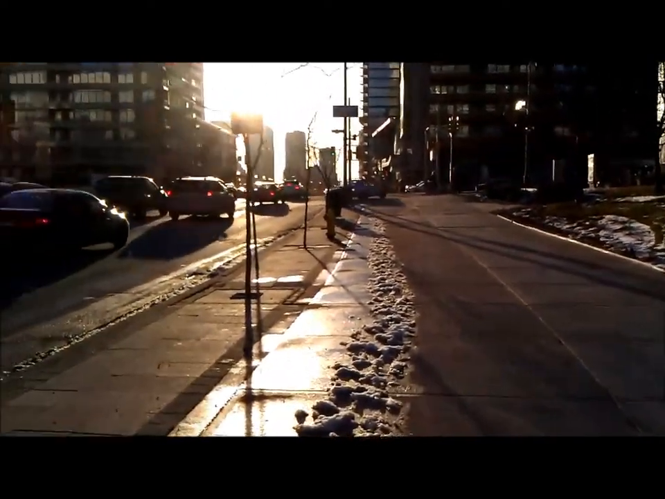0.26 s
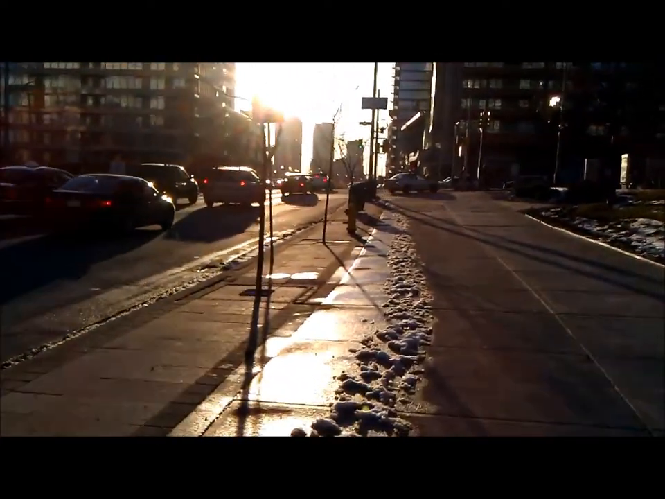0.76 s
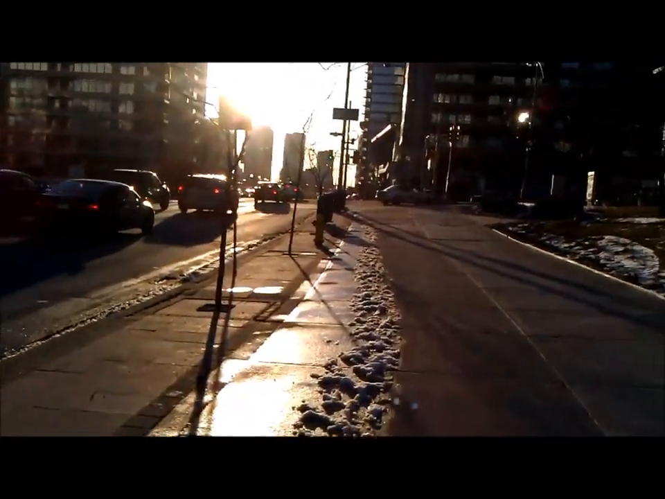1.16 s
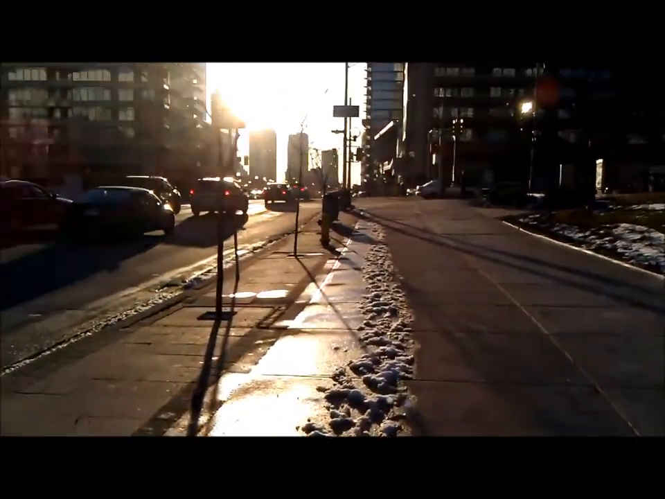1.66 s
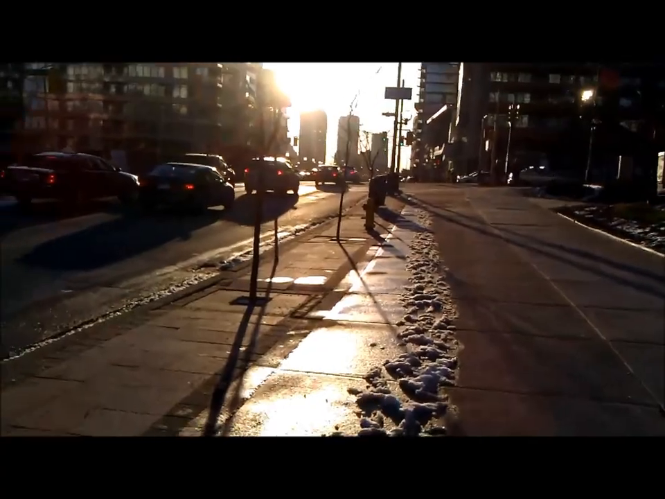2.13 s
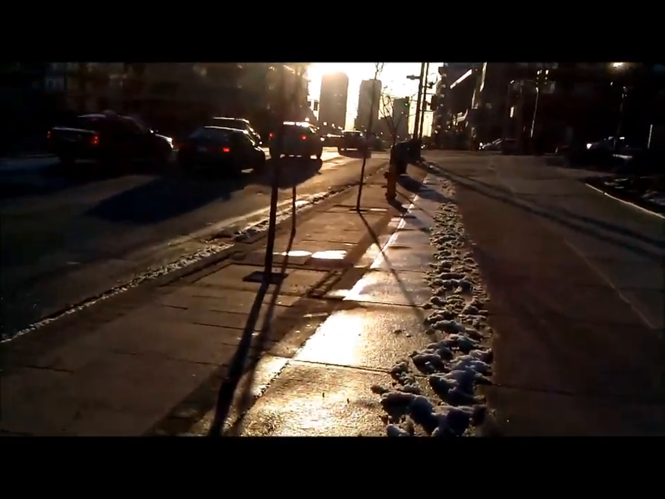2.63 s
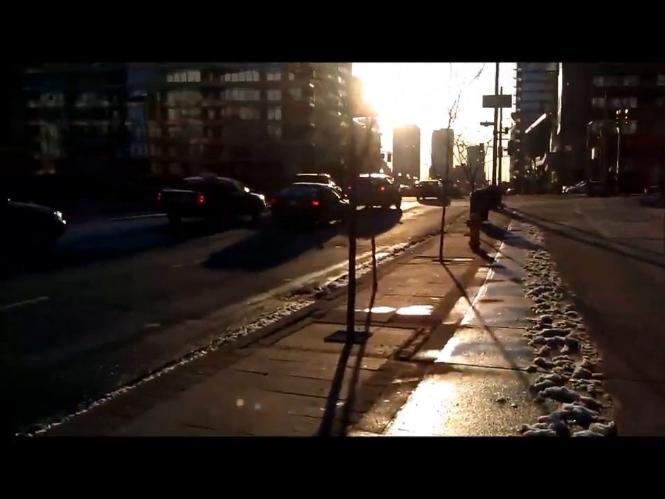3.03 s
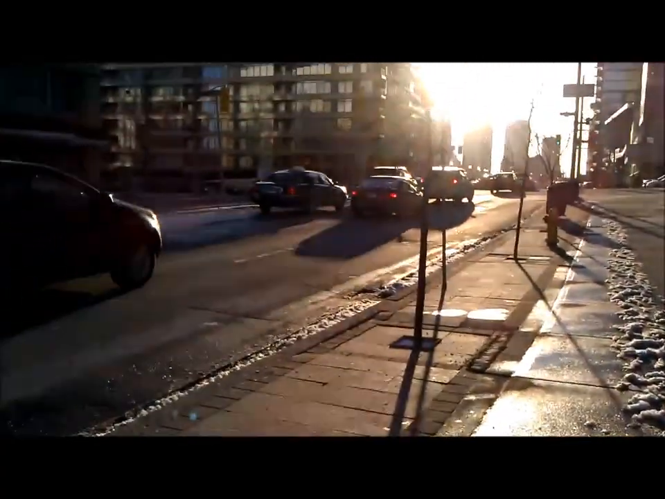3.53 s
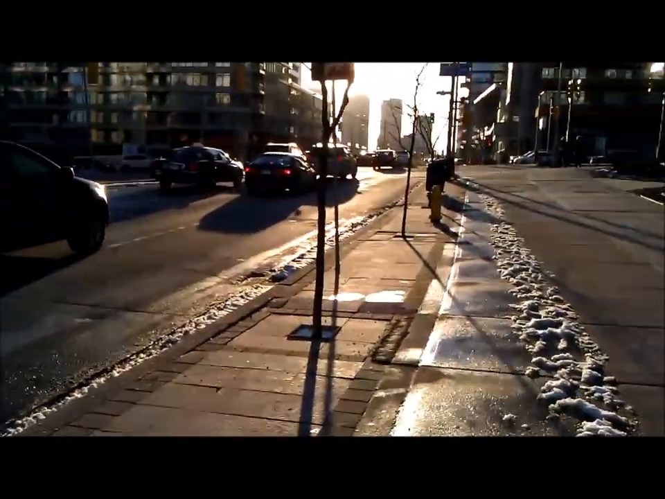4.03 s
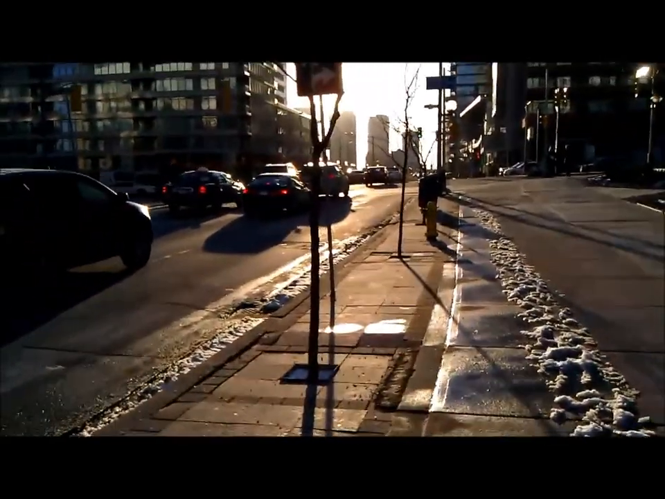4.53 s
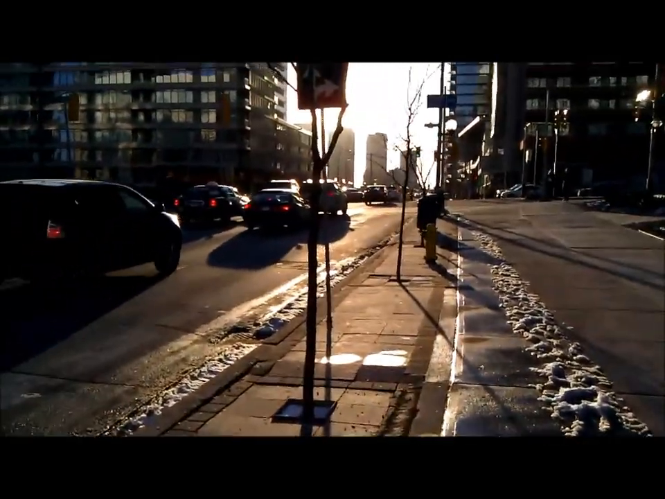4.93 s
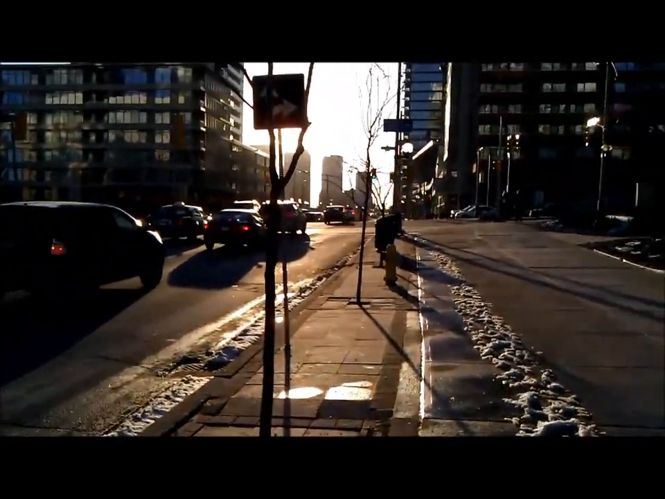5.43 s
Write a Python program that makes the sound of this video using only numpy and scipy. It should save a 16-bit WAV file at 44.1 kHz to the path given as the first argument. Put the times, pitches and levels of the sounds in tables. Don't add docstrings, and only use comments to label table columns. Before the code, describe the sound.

A wet multi-lane street heard from the kerb through a small, bare microphone, nearly mono and with a limited top end. Low distant rumble and faint idling hums lie under everything. A car passes at 0.7 s with soft tread roar and fizzing spray, then the hiss eases. Around 2 s a short thud and abrupt wind buffets hit the microphone, again near 2.4 s. Passes follow at 2.4, 2.9 and 3.3 s, with a sharp tick at 2.8 s. From about 3 s a large engine pulls away in a deep, uneven throb, rising slightly. A brief pass at 4.0 s, more wind thumps near 4.4 s and a roaring pass at 4.7 s lead to the nearest, wettest car at 5.1 s: bright, ringing hiss and hard crackling drops. A dull knock at 5.4 s precedes the last, loudest roar and soft seam thud at 5.5 s; then the spray drops slightly.

```python
import sys
import numpy as np
from scipy import signal
from scipy.fft import rfft, irfft, next_fast_len
from scipy.io import wavfile
from scipy.ndimage import uniform_filter1d, minimum_filter1d

SR = 44100
rng = np.random.default_rng(int(sys.argv[2]) if len(sys.argv) > 2 else 0)


def to_wav(sig):
    pcm = np.clip(np.atleast_2d(sig), -1, 1) * 32767
    pcm = np.round(pcm).astype(np.int16)
    wavfile.write(sys.argv[1], SR, pcm.T)


def level_to_linear(level):
    exponent = np.asarray(level, float) / 20
    return 10 ** exponent


N = 250387
TIME = np.arange(N) / SR

# [f/Hz, level/dB per Hz]
RUMBLE_SPECTRUM = [(20, -5.5), (45, -1.5), (90, -1), (130, -3.5), (200, -2), (300, -3.5), (450, -7.5),
                   (620, -15.5), (1200, -23)]
# [f/Hz, level/dB per Hz]
ROAR_SPECTRUM = [(300, -22.5), (520, -8), (630, -6), (760, -2), (850, 0.5), (950, -1), (1050, -1),
                 (1280, -2.5), (1600, -2), (1900, -2), (2180, -2), (2500, -7), (3200, -9), (8000, -23.5)]
# [f/Hz, level/dB per Hz]
WIND_SPECTRUM = [(8, 3), (20, 2), (40, -3), (80, -15), (160, -30.5), (400, -44)]
# [f/Hz, level/dB per Hz]
SWISH_SPECTRUM = [(900, -31), (1800, -10.5), (2500, -3.5), (3300, -1.5), (4100, -2.5), (5000, -4.5),
                  (7000, -15.5)]
# [f/Hz, level/dB per Hz]
SPRAY_SPECTRUM = [(1500, -36.5), (3000, -17.5), (4200, -3), (5000, -1.5), (6000, 0.5), (7200, -1.5),
                  (9000, -2.5)]
# [f/Hz, level/dB]
CONVERTER_EDGE = [(7000, 0), (7450, -3), (7700, -10.5), (7950, -21), (8150, -31), (8270, -42), (8330, -110)]

# [closest t/s, spray level/dB, tread roar level/dB, approach t/s, leave t/s]
CARS = [
    (.73, -16.5, -37, 0.29, 0.53),
    (2.45, -18, -38.5, 0.39, 0.37),
    (2.93, -17.5, -37, .3, 0.33),
    (3.3, -21, -40.5, .2, 0.39),
    (4.041, -18, -33.5, 0.22, 0.16),
    (4.72, -22, -33, 0.2, 0.098),
    (5.12, -12, -32.5, 0.27, .24),
    (5.46, -14.5, -24, 0.14, 0.63),
]
# [t/s, boost of the rumble level/dB, length t/s]
SEAMS = [
    (1.99, 4.5, .05),
    (3.95, 2, 0.12),
    (5.496, 2, 0.12),
]
# [t/s, level/dB, length t/s]
GUSTS = [(.2, -33.5, 0.17), (0.506, -32.5, 0.11), (.82, -34.5, .08), (1.27, -30, .1), (1.5, -35.5, .2),
         (1.79, -26.5, 0.096), (2.025, -33, 0.088), (2.22, -30.5, 0.16), (2.45, -29.5, .15),
         (2.79, -30, 0.11), (2.962, -32, .08), (3.503, -36, .3), (3.86, -32.5, .07), (4.083, -33, .12),
         (4.25, -30, .1), (4.42, -30.5, .1), (4.63, -31, 0.067), (5.45, -40, .1)]
# [t/s, peak level/dB, f/Hz, cycles, share of ragged noise]
EDDIES = [(1.89, -17, 170, 4.9, 0.56), (1.982, -10, 190, 0.95, 0.15), (1.995, -16.5, 129, 1.8, 0.34),
          (1.998, -28, 418, 9, 0.32), (2.0, -21, 272, 5, 0.42), (2.341, -20, 200, 4.1, 0.13),
          (2.007, -13.5, 259, 1.8, 0.23), (2.011, -22, 45, 1, 0), (2.152, -17, 93, 2.2, 0.074),
          (2.362, -13, 75, 1.3, 0), (2.372, -15.5, 189, 3, 0.13), (2.42, -24, 45, 3.4, 0.19),
          (2.388, -14.5, 125, 2.3, 0.088), (2.405, -16, 150, 2.6, 0.36), (2.457, -8.5, 170, 1.9, 0.12),
          (2.464, -11, 60, 1.1, 0.12), (4.356, -24, 214, 8.3, 0.07), (4.41, -17, 50, 1, 0),
          (4.445, -17, 55, 1.5, 0), (4.467, -11.5, 95, 1.4, 0.029), (2.8, -22.5, 149, 5.1, 0.69),
          (4.52, -19, 150, 1.5, 0.5)]
# [start t/s, end t/s, f/Hz, level/dB]
IDLE_HUMS = [
    (-.3, 1.87, 183.5, -42.5),
    (1.9, 4, 181, -42.5),
    (1.1, 1.8, 42.3, -38.5),
    (0, 0.55, 26, -40.5),
    (1.05, 1.35, 100, -32),
]
# [t/s, firing rate f/Hz]
FIRING_RATE = [
    (2.85, 52),
    (3.345, 54.8),
    (3.93, 54.8),
    (4.65, 59),
    (5.68, 62),
]
# [start t/s, end t/s, level/dB]
THROTTLE = [
    (2.96, 3.14, -33.5),
    (3.26, 4.02, -31),
    (3.98, 4.3, -33),
    (4.36, 4.72, -29.5),
    (5.18, 5.72, -32),
]
# [t/s, peak level/dB, f/Hz, cycles]
TICKS = [
    (2.7913, -6.5, 1680, 2),
    (5.3968, -9, 900, 1.6),
    (5.3963, -14, 450, 1.3),
    (4.1085, -17, 1300, 2.5),
    (.043, -18, 1500, 2.5),
]
# [t/s, boost of the spray level/dB, length t/s]
SLAPS = [
    (5.057, 1.5, .01),
    (5.082, 1.5, .008),
    (5.163, 2, .008),
    (5.212, 1.5, .004),
    (5.36, 1.5, .01),
    (5.5, 1.5, .015),
    (2.839, 4, .006),
    (1.99, 3, .03),
    (4.74, 3, .03),
]
# [t/s, peak level/dB, f/Hz, cycles]
PORT_DROPS = [
    (5.0572, 1, 5900, 4),
    (5.0929, 1.6, 5800, 4),
    (5.1521, 1.4, 5800, 4),
    (5.1619, -1.5, 5700, 7),
    (5.162, -3, 2500, 2.5),
    (5.1627, -6, 3900, 3),
    (5.1838, 1, 5900, 4),
    (5.4921, .7, 5900, 4),
]
# [t/s, low f/Hz, high f/Hz]
HISS_SLIPS = [(.279, 6200, 8300), (.419, 4600, 5700), (.442, 7600, 8300), (.813, 7600, 8300),
              (1.394, 7600, 8300), (1.742, 5700, 6900), (2.067, 4150, 5200), (2.067, 6900, 8300),
              (3.182, 5700, 6900), (3.275, 7600, 8300), (3.739, 6200, 8300), (3.785, 4600, 6250),
              (3.785, 6900, 8300), (3.832, 6900, 8300), (3.902, 5150, 6250), (4.18, 7600, 8300),
              (4.227, 4600, 5700), (4.97, 5150, 6250)]

RUMBLE_DB, RUMBLE_FOLLOWS = -33, 0.6
ROAR_REACH, ROAR_FAR_DB = 2.9, -30
UPPER_FAR_DB, UPPER_NEAR_DB, UPPER_S = -3, 0.6, 1.1
FINE_FAR_DB, FINE_DB_PER_S = -2.5, 0.82
BREEZE_DB, STEADIED = -45, .7
THROB_S, CYLINDERS = 3.345, 8
THROTTLE_RISE_S, COAST_DB = 0.061, -38
SPRAY_FALL, SPRAY_FAR_DB = 1.53, -33
SWISH_DB, SWISH_FALL, SWISH_FAR_DB, SWISH_LAG_S = -7.5, 1.07, -37, .05
PUDDLE_END_S, PUDDLE_DROP_DB, PUDDLE_EDGE_S = 5.52, -3.5, .012
PORT_HZ, PORT_WIDTH_HZ, PORT_DB = 5993, 1540, 10.5
CEILING, FULL_SCALE = .93, .98
SLIP_HALF, SLIP_BAND_HZ = 1024, 690


def evened(x):
    return x / np.sqrt(np.mean(x ** 2) + 1e-20)


def coloured(x, spectrum):
    hz, db = np.transpose(spectrum)
    size = next_fast_len(N)
    bins = np.fft.rfftfreq(size, 1 / SR)
    gain = level_to_linear(np.interp(np.log(bins + 1), np.log(hz + 1), db, left=-80))
    return evened(irfft(rfft(x, size) * gain, size)[:N])


def lifted(x, above_hz, lift_db):
    highpass = signal.firwin(257, above_hz, pass_zero=False, fs=SR)
    upper = signal.oaconvolve(x, highpass, "same")
    return x + (level_to_linear(lift_db) - 1) * upper


def patchy(patch_db, flicker_db, size=256):
    hop = size // 4
    frames = N // hop + 5
    real, imag, patches = rng.standard_normal((frames, size // 2 + 1, 3)).T
    patches = uniform_filter1d(patches, size=5, axis=0)
    patches = evened(uniform_filter1d(patches, size=40, axis=1))
    flicker = evened(uniform_filter1d(rng.standard_normal(frames), size=12))
    z = (real + 1j * imag) * level_to_linear(patch_db * patches + flicker_db * flicker)
    return signal.istft(z, nperseg=size, noverlap=size - hop)[1][:N]


def bump(s, length):
    return np.exp(-.5 * ((TIME - s) / (length / 2)) ** 2)


def span(start, end, rise):
    return np.clip(np.minimum(TIME - start, end - TIME) / rise, 0, 1)


def passing(column, reach, fall, far_db, lag=0):
    power = level_to_linear(2 * far_db)
    for car in CARS:
        since = TIME - car[0] - lag
        away = since / (reach * np.where(since < 0, car[3], car[4]))
        power = power + level_to_linear(2 * car[column]) / (1 + away ** 2) ** fall
    return 10 * np.log10(power)


def strikes(table):
    out = np.zeros(N)
    for s, db, hz, cycles in table:
        turns = np.maximum(TIME - s, 0) * hz
        envelope = np.minimum(turns * 2, 1) * np.exp(-(turns / cycles) ** 2)
        ring = np.sin(2 * np.pi * turns) * envelope
        out -= level_to_linear(db) * ring / abs(ring).max()
    return out


def far_rumble(roar_db):
    thuds_db = sum(db * bump(s, length) for s, db, length in SEAMS)
    rumble_db = RUMBLE_DB + RUMBLE_FOLLOWS * (roar_db - roar_db[0]) + thuds_db
    noise = patchy(patch_db=0.8, flicker_db=-0.73, size=1024)
    return coloured(noise, RUMBLE_SPECTRUM) * level_to_linear(rumble_db + 3.5)


def tread_roar(roar_db):
    upper_db = UPPER_NEAR_DB + (UPPER_FAR_DB - UPPER_NEAR_DB) * np.exp(-(TIME / UPPER_S) ** 2)
    noise = coloured(patchy(patch_db=0.5, flicker_db=0.4), ROAR_SPECTRUM)
    return lifted(noise, 1600, upper_db) * level_to_linear(roar_db + 0.42)


def road():
    roar_db = passing(column=2, reach=ROAR_REACH, fall=1, far_db=ROAR_FAR_DB)
    return far_rumble(roar_db) + tread_roar(roar_db)


def breeze():
    flow = coloured(rng.standard_normal(N), WIND_SPECTRUM)
    lumps = uniform_filter1d(uniform_filter1d(flow ** 2, size=2500), size=2500)
    steady = evened(flow / lumps ** (STEADIED / 2))
    return steady * (level_to_linear(BREEZE_DB) + sum(level_to_linear(db) * bump(s, length) for s, db, length in GUSTS))


def eddies():
    out = np.zeros(N)
    turbulence = rng.standard_normal(N)
    for s, db, hz, cycles, share in EDDIES:
        band = signal.butter(2, [hz / 2, hz * 1.6], "bandpass", fs=SR, output="sos")
        ragged = evened(signal.sosfilt(band, turbulence))
        push = -np.cos(2 * np.pi * hz * (TIME - s))
        share = np.clip(share, 0, 1)
        out += level_to_linear(db) * bump(s, 0.48 * cycles / hz) * ((1 - share) * push + share * ragged)
    return out


def idling_cars():
    out = np.zeros(N)
    for start, end, hz, db in IDLE_HUMS:
        waver = 1 + .006 * evened(uniform_filter1d(rng.standard_normal(N), size=6000))
        tone = np.cos(2 * np.pi * np.cumsum(hz * waver) / SR)
        out += np.sqrt(2) * level_to_linear(db) * span(start, end, 0.23) * tone
    return out


def large_engine():
    times, rates = np.transpose(FIRING_RATE)
    turns = np.cumsum(np.interp(TIME, times, rates)) / SR
    cycle = (turns - np.interp(THROB_S, TIME, turns)) / CYLINDERS
    throb = 1 + 0.44 * np.cos(2 * np.pi * cycle)
    firing = np.cos(2 * np.pi * turns) + 0.093 * np.cos(4 * np.pi * turns)
    load = level_to_linear(COAST_DB) * span(times[0], 2 * TIME[-1], THROTTLE_RISE_S)
    for start, end, db in THROTTLE:
        load = np.maximum(load, level_to_linear(db) * span(start, end, THROTTLE_RISE_S))
    return load * evened(throb * firing)


def droplet_fizz():
    sizes = level_to_linear(3.0 * np.minimum(rng.exponential(1, N), 5))
    bursts = rng.random(N) < 6000 / SR
    drops = rng.standard_normal(N) * sizes * bursts
    mist = evened(patchy(patch_db=1.1, flicker_db=.5))
    fizz = coloured(mist + 0.22 * evened(drops), SPRAY_SPECTRUM)
    return lifted(fizz, 6230, FINE_FAR_DB + FINE_DB_PER_S * TIME)


def spray():
    dry_db = PUDDLE_DROP_DB * (1 + np.tanh((TIME - PUDDLE_END_S) / PUDDLE_EDGE_S)) / 2
    slaps_db = sum(db * bump(s, length) for s, db, length in SLAPS)
    spray_db = passing(column=1, reach=0.98, fall=SPRAY_FALL, far_db=SPRAY_FAR_DB) + dry_db
    swish_db = passing(column=1, reach=1, fall=SWISH_FALL, far_db=SWISH_FAR_DB - SWISH_DB, lag=SWISH_LAG_S)
    swish_db = swish_db + SWISH_DB + dry_db
    fizz = droplet_fizz() * level_to_linear(spray_db - 3.5 + slaps_db)
    swish = coloured(patchy(patch_db=0.67, flicker_db=0.74), SWISH_SPECTRUM)
    return fizz + swish * level_to_linear(swish_db + 0) * level_to_linear(0.23 * slaps_db)


def scene():
    air = road() + breeze() + eddies()
    street = air + idling_cars() + large_engine() + strikes(TICKS) + spray()
    return np.array([street, street])


def limited(x):
    envelope = -minimum_filter1d(-abs(x), size=41)
    return x * uniform_filter1d(np.minimum(1, CEILING / (envelope + 1e-9)), size=41)


def slipped(x):
    out = x.copy()
    length = 2 * SLIP_HALF
    hz = np.fft.rfftfreq(length, 1 / SR)
    window = np.sin(np.pi * (np.arange(length) + .5) / length)
    noise = rng.standard_normal((len(HISS_SLIPS), length))
    for (s, low_hz, high_hz), fresh in zip(HISS_SLIPS, noise):
        middle = round(s * SR)
        part = slice(middle - SLIP_HALF, middle + SLIP_HALF)
        own, new = rfft(x[part] * window), rfft(fresh)
        for edge in np.arange(high_hz, low_hz + SLIP_BAND_HZ / 4, -SLIP_BAND_HZ):
            band = (hz > max(edge - SLIP_BAND_HZ, low_hz)) & (hz <= edge)
            level = np.linalg.norm(own[band]) / np.linalg.norm(new[band])
            out[part] += irfft(new * band) * 1.93 * level * window ** 2
            out[part] -= irfft(own * band) * window
    return out


def low_pass(x):
    return signal.sosfilt(signal.butter(12, 15760, fs=SR, output="sos"), x)


def record(dry):
    size = next_fast_len(N)
    hz = np.fft.rfftfreq(size, 1 / SR)
    port = 1 + (level_to_linear(PORT_DB) - 1) / (1 + ((hz - PORT_HZ) / (PORT_WIDTH_HZ / 2)) ** 2)
    edge = level_to_linear(np.interp(hz, *np.transpose(CONVERTER_EDGE)))
    street = limited(irfft(rfft(dry[0], size) * port, size)[:N])
    cover = np.minimum(sum(1.3 * bump(s + .0003, .001) for s, *_ in PORT_DROPS), 1)
    wet_port = street * (1 - .95 * cover) + strikes(PORT_DROPS)
    x = irfft(rfft(wet_port, size) * edge, size)[:N]
    x = np.clip(x, -FULL_SCALE, FULL_SCALE)
    return low_pass(np.array([slipped(x), slipped(x)]))


dry = scene()
out = record(dry)
to_wav(out)
```